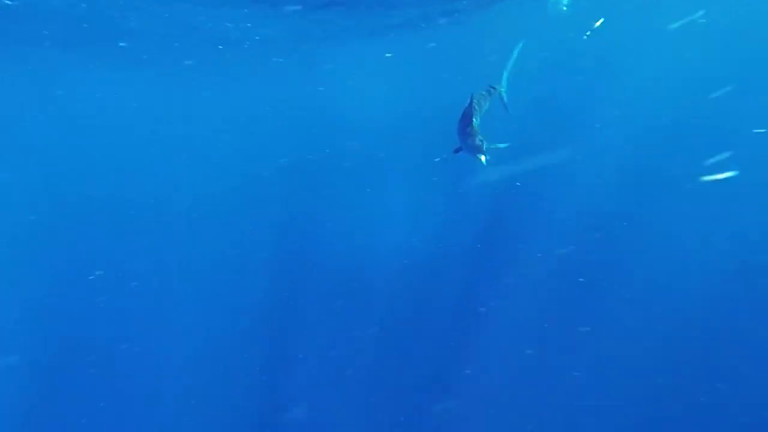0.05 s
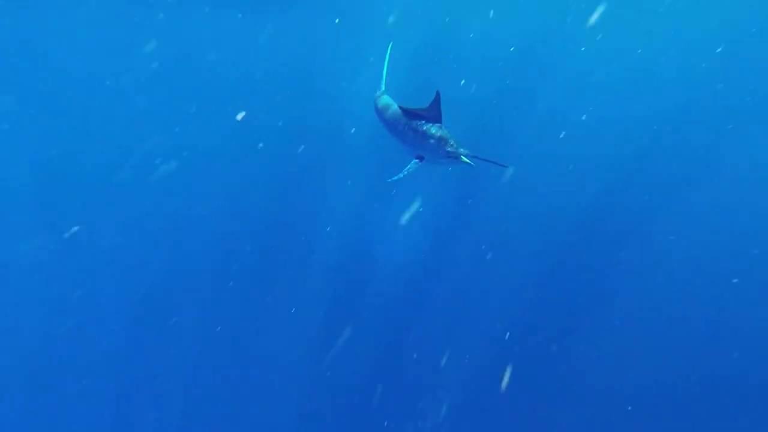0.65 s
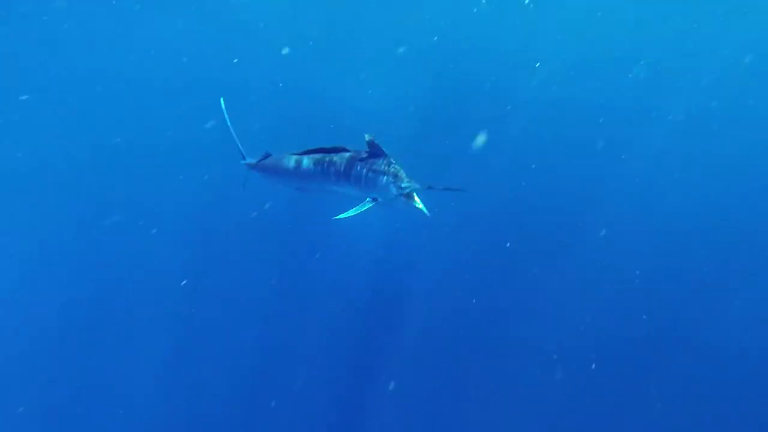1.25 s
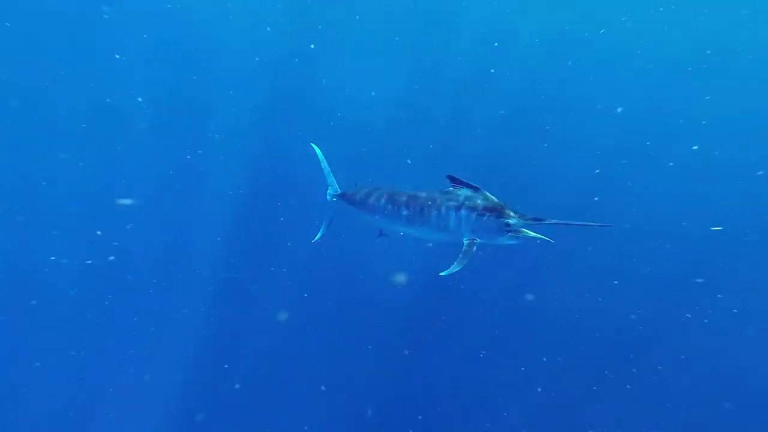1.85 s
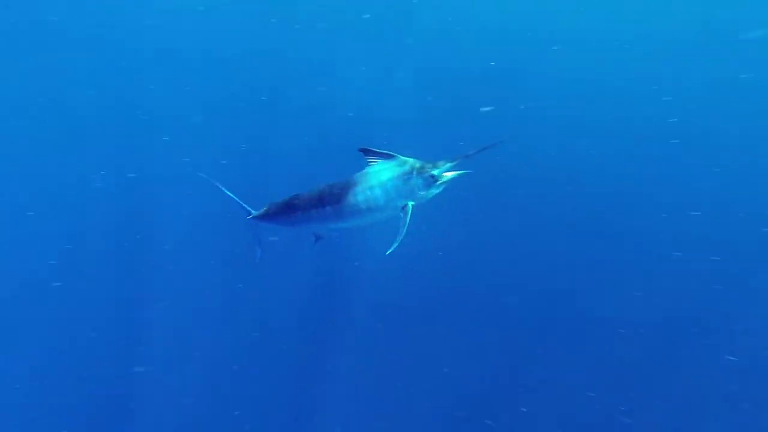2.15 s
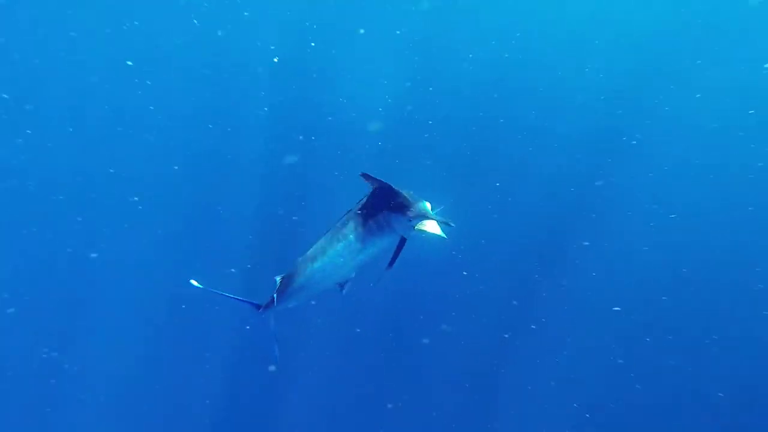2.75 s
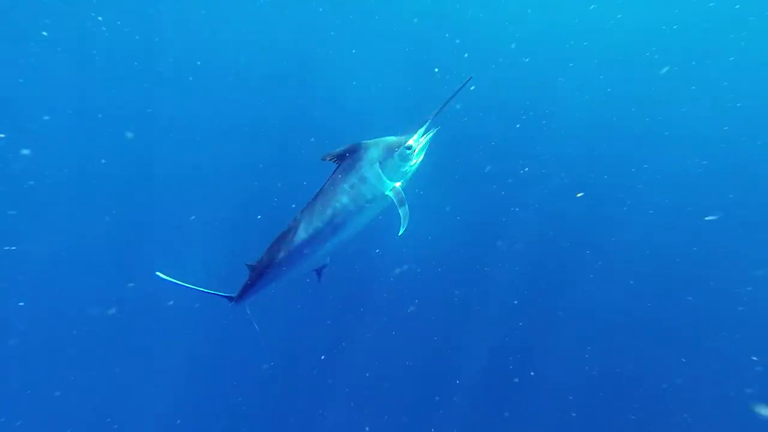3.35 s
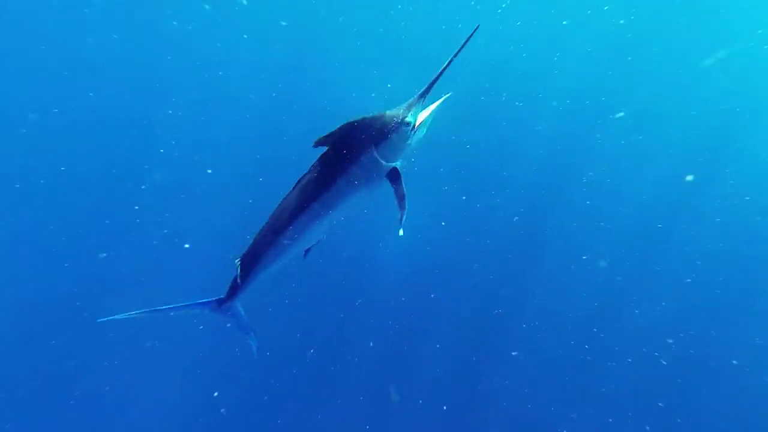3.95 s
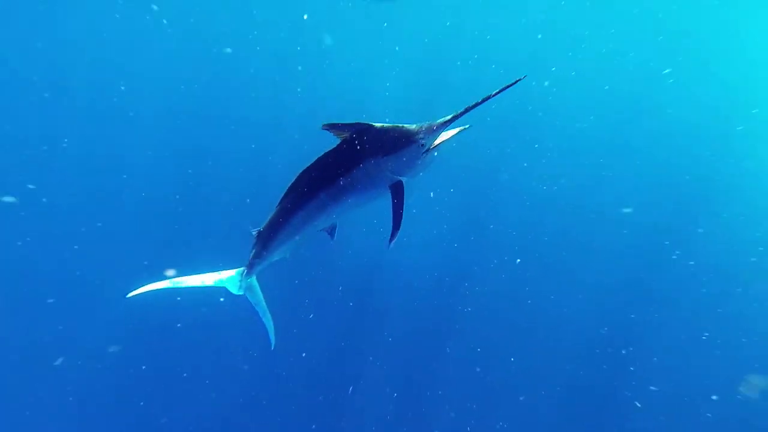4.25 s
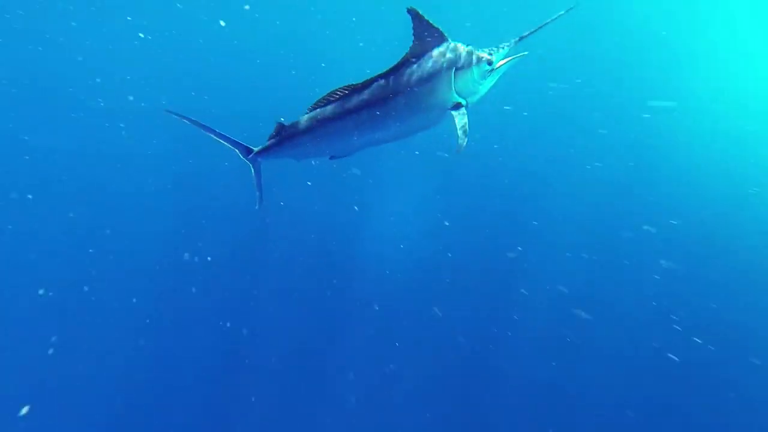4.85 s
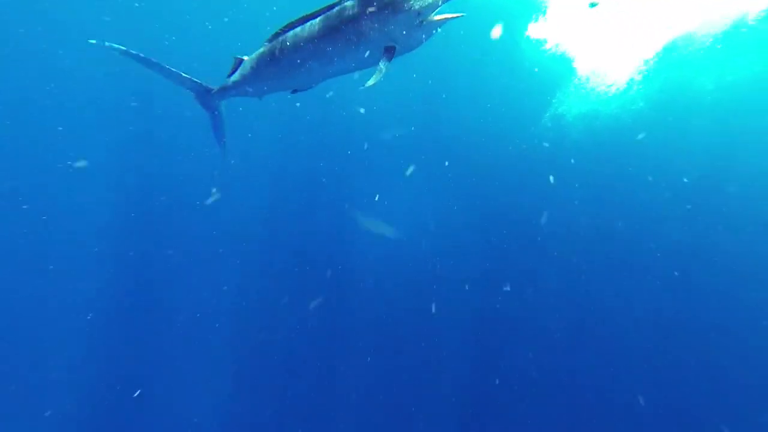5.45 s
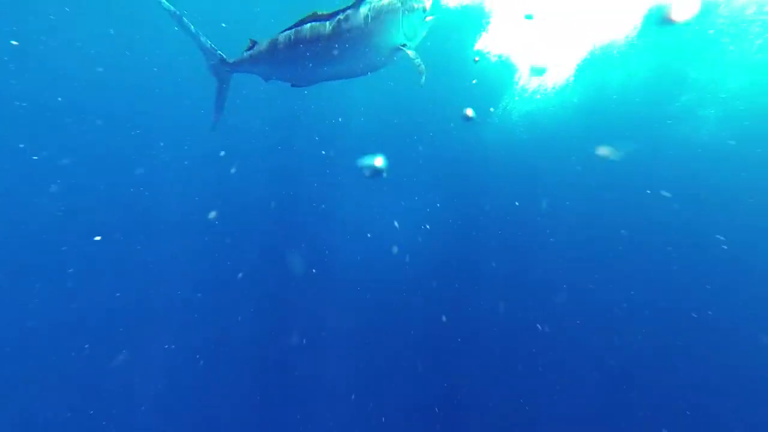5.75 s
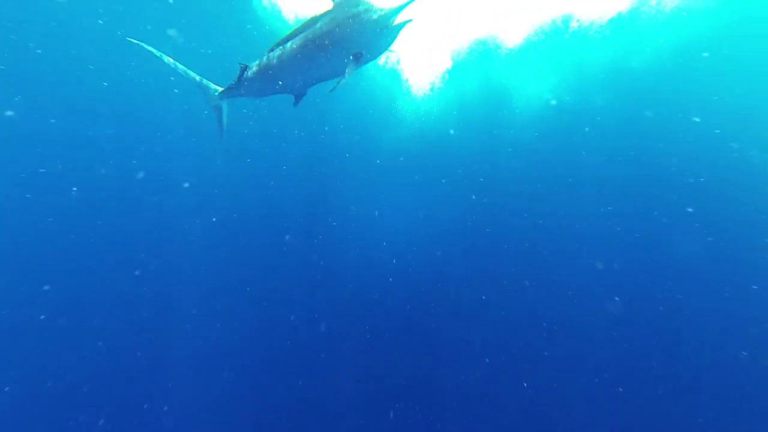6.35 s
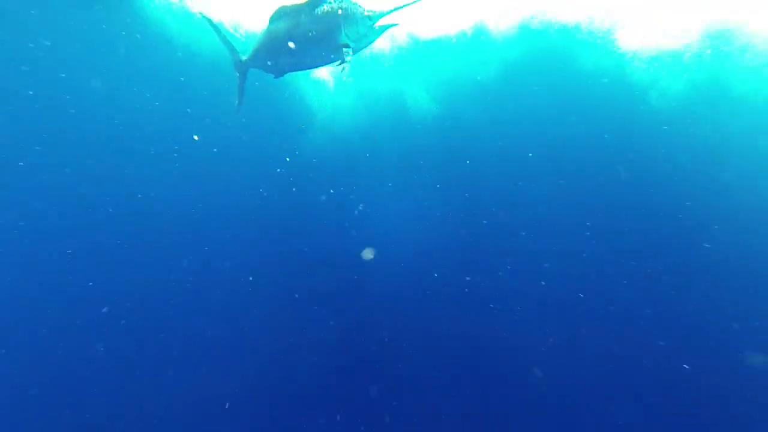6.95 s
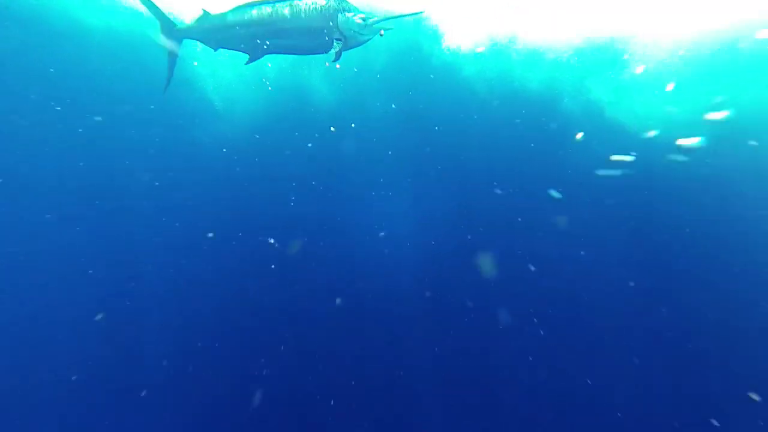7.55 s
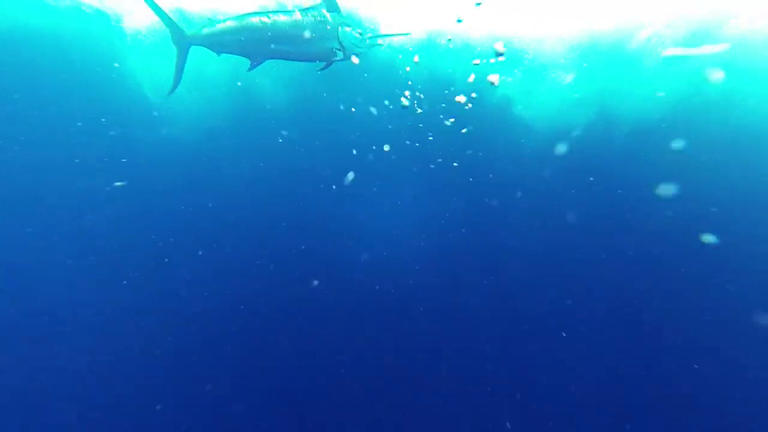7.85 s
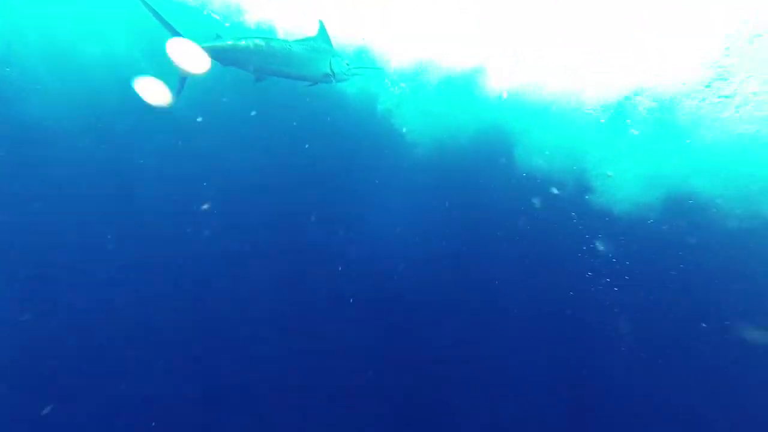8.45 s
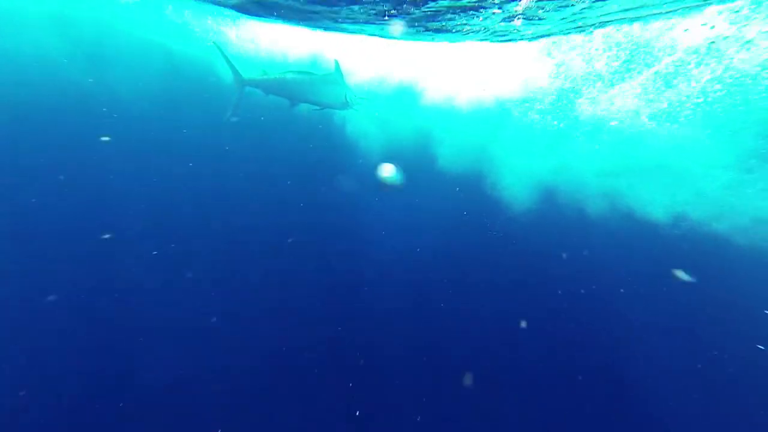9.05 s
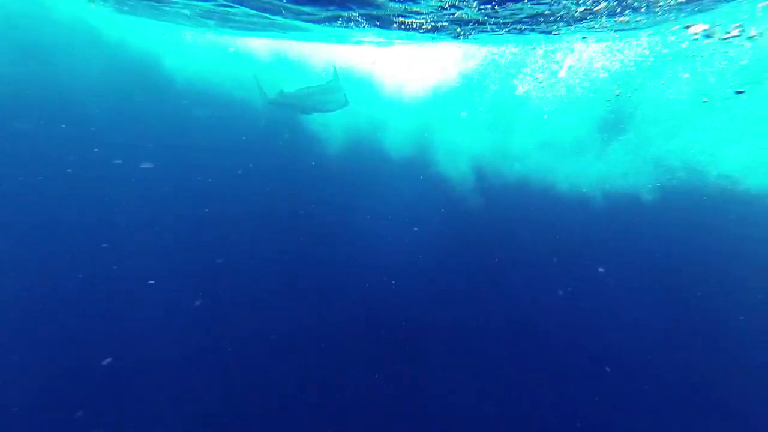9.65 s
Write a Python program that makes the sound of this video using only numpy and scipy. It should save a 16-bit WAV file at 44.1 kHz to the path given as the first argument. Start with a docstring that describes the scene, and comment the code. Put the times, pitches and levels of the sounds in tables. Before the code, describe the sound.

Muffled water rushes in swells over a camera towed just below the sea surface, above a low shuddering rumble. Dull thumps and knocks hit the housing while bubbles glug and pop. Midway, the taut tow line hums, rising to a low growl with the strongest rush, until a jolt cuts it off. Crackling bubbles, more thumps and soft gurgles follow, all heard from inside the sealed case.

```python
"""Just under the surface of the sea, a camera in a sealed housing is towed behind a boat.
Turbulent water rushes over the housing and excites its resonances; the body shudders in its own wake.
Big bubbles glug past as damped oscillators, and clouds of small ones gurgle, crackle and sizzle on the case.
Jolts of the tow line thump the housing and stall the flow; vortex shedding strums the line as it speeds up."""
import sys
import numpy as np
from scipy import signal
from scipy.fft import rfft, irfft
from scipy.io import wavfile
from scipy.ndimage import uniform_filter1d

SR = 44100
rng = np.random.default_rng(int(sys.argv[2]) if len(sys.argv) > 2 else 0)


def unload_wav(signal):
    """Save mono or channel-first audio to the path in sys.argv[1] as 16-bit WAV at rate SR, clipped to [-1, 1]."""
    wavfile.write(
        sys.argv[1],
        SR,
        np.round(np.clip(np.atleast_2d(signal).T, -1, 1) * 32767).astype(np.int16),
    )


N = 428211
TIME, BINS = np.arange(N) / SR, np.fft.rfftfreq(N, 1 / SR)
EDGE_HZ = 15800
SLACK_S = 0.02  # the line goes slack this long before a jolt; also the fade of strum and spray


def amp(db):
    """Amplitude ratio of a level in decibels."""
    return 10 ** (np.asarray(db) / 20)


def unit_rms(x):
    """Normalisation to rms 1."""
    return x / np.sqrt(np.mean(x ** 2) + 1e-20)


def colour(points):
    """Spectral envelope through (Hz, dB) points on a logarithmic frequency axis."""
    hz, db = np.transpose(points)
    return amp(np.interp(np.log(BINS + 1), np.log(hz + 1), db))


def filtered(x, gain):
    """Linear filtering by one gain per frequency."""
    return irfft(rfft(x) * gain, N)


def noise(gain):
    """Spectrally shaped noise of rms 1."""
    return unit_rms(filtered(rng.standard_normal(N), gain))


def wander(rate_hz):
    """Random modulation of rms 1, mostly below the given rate."""
    return unit_rms(np.interp(2 * rate_hz * TIME, np.arange(N // 10), rng.standard_normal(N // 10)))


def drifted(x, share, rate_hz=6):
    """Frequency modulation: a varying delay slides every pitch in x by about this share."""
    return np.interp((TIME + share * np.cumsum(wander(rate_hz)) / SR) % TIME[-1], TIME, x)


def add(mix, s, sound):
    """Superposition of a sound on the mix at s seconds."""
    part = mix[max(round(s * SR), 0):][:len(sound)]
    part += sound[:len(part)]


def resonance(hz, width):
    """Resonance curve of one mode, falling to half at width Hz from its centre."""
    return 1 / (1 + ((BINS - hz) / width) ** 2)


# Modes of the housing. Each row: frequency in Hz, half width in Hz, gain in dB.
HOUSING_MODES = [(523, 316, -14), (672.5, 89, 1.5), (1170, 360, -11.5), (1416, 211, 2.5),
                 (2136, 360, -11.5), (2730, 616, -21), (4000, 1300, -36.5)]
def housing(leak_db=-17):
    """Transmission through the housing: its modes and a muffled leak add in power."""
    power = sum((amp(db) * resonance(hz, width)) ** 2 for hz, width, db in HOUSING_MODES)
    return np.sqrt(power + amp(leak_db) ** 2 / (1 + (BINS / 900) ** 4))


# Swells of flow. Each row: start in seconds, crest in seconds, rush in dB, treble relative to the rush
# in dB (set by air in the water), foam hiss in dB, shudder in dB.
FLOW_SWELLS = [(-0.6, 0.038, -48, -20, -65, -30), (0.822, 1.246, -59, 11, -56.5, -53),
               (1.105, 1.787, -38.5, -1.5, -56, -29.5), (1.724, 2.004, -35, -18, -48, -39),
               (1.948, 2.24, -38.5, 2, -57, -36), (2.523, 3.74, -39.5, 6.5, -56.5, -38),
               (4.35, 4.907, -37, 2, -55, -46), (5.786, 6.35, -31.5, 6.5, -45.5, -56),
               (7.25, 7.484, -46.5, -26.5, -73, -43), (8.334, 8.68, -46, -26, -87, -36),
               (8.894, 9.447, -72, -13, -97, -31)]
def swells(levels_db, calm_db, sag_db_per_s, release_db_per_s=1109, build_db=22.5):
    """Incoherent swells add in power; each builds to a crest and is cut off just before the next blow."""
    t, power = TIME[::64], amp(calm_db) ** 2
    for (start, crest, *_), db in zip(FLOW_SWELLS, levels_db):
        cutoffs = [s - SLACK_S for s, pressure, _ in blows() if s > crest and pressure > 0]
        end = min(cutoffs, default=N / SR)
        build = build_db * np.maximum((crest - t) / (crest - start), 0) ** 1.015
        fall = sag_db_per_s * np.maximum(t - crest, 0) + release_db_per_s * np.maximum(t - end, 0)
        power = power + amp(db - build - fall) ** 2
    return np.interp(TIME, t, np.sqrt(power))


def flow(stall_db_per_pressure=14.5, recover_s=0.051):
    """Flow noise follows the flow: the gains of rush, treble and hiss dip as each blow stalls it."""
    _, _, rush_db, air_db, hiss_db, _ = np.transpose(FLOW_SWELLS)
    stalled = amp(-stall_db_per_pressure * aftermath(recover_s))
    return stalled * np.array([swells(rush_db, calm_db=-56.5, sag_db_per_s=3.5),
                               swells(rush_db + air_db, calm_db=-57.5, sag_db_per_s=3.5),
                               swells(hiss_db, calm_db=-78, sag_db_per_s=19.5)])


# Spectrum of fine foam. Each row: frequency in Hz, relative spectral level in dB.
FOAM_SPECTRUM = [(2500, -6), (4300, 5.5), (6300, -4.5), (7300, 0), (10200, 0), (11200, -5), (12000, -16.5),
                 (15500, -29)]
def rush(eddy_db=2.5, grain_db=3.0, treble_hz=1800, ripple_db=2.0, flicker_db=0.6):
    """Forced vibration: eddies and tiny bubbles drive the housing's modes, and foam hisses above them."""
    body_gain, treble_gain, hiss_gain = flow()
    eddies = amp(eddy_db * wander(110))
    impacts = unit_rms(rng.standard_normal(N) * eddies * amp(grain_db * wander(760)))
    shell = filtered(impacts, housing())
    bands = [resonance(hz, width) for hz, width, _ in HOUSING_MODES]
    total = sum(bands)
    # Each mode slides and flutters with the air around the housing.
    modes = [drifted(filtered(shell, band / total), .02) * amp(wander(30)) for band in bands]
    # Neighbouring modes cancel at antiresonances.
    notches = np.prod([1 - 0.63 * resonance(hz, 0.024 * hz) for hz in (860, 1736, 2476, 4870)], axis=0)
    shell = unit_rms(filtered(sum(modes), notches))
    treble = filtered(shell, 1 / (1 + (treble_hz / (BINS + 1)) ** 10))
    # The many high modes of the walls ripple the spectrum.
    ripple = np.interp(BINS / 200, np.arange(SR // 100), rng.standard_normal(SR // 100))
    fizz = drifted(filtered(impacts, colour(FOAM_SPECTRUM) * notches * amp(ripple_db * ripple)), .02)
    foam = unit_rms(fizz) * hiss_gain * unit_rms(amp(flicker_db * wander(300)))
    return (shell - treble) * body_gain + treble * treble_gain + foam


# Spectrum of the wake. Each row: frequency in Hz, relative spectral level in dB.
WAKE_SPECTRUM = [(10, -7), (26, 1), (40, -11), (70, -9.5), (160, -30.5), (300, -38), (1500, -78)]
def buffet(sway_hz=29.9, sway_db=-3, wake_db=0.5, drift=0.087):
    """Wake buffeting: the towed body shudders at a loose rate in its own turbulence."""
    shudder_db = [row[-1] for row in FLOW_SWELLS]
    shudder = swells(shudder_db, calm_db=-42.5, sag_db_per_s=-3.5, release_db_per_s=607)
    sway = np.sin(2 * np.pi * np.cumsum(sway_hz * (1 + drift * wander(9.7))) / SR)
    return shudder * (amp(sway_db) * unit_rms(sway) + amp(wake_db) * noise(colour(WAKE_SPECTRUM)))


def ring(hz, decay_ms, attack_ms, glide=0):
    """Damped oscillation whose envelope peaks at 1; the pitch slides by the share glide."""
    ms = np.arange(SR // 12) * 1000 / SR
    pitch = hz * (1 + glide * np.tanh(ms / decay_ms / 2))
    envelope = (1 - np.exp(-(ms / attack_ms) ** 2)) * np.exp(-ms / decay_ms)
    return envelope / envelope.max() * np.sin(2 * np.pi * np.cumsum(pitch) / SR)


def glug(hz, decay_ms, attack_ms=1.67, shell_hz=1330, shell_db=-15, wobble=0.4):
    """Bubble resonance: pinch-off gives a faint tick and a wobbling tone; the housing rings along."""
    tone = ring(hz, decay_ms, attack_ms, glide=0.061 * rng.uniform(-1.08, 2.08))
    shake = unit_rms(signal.lfilter(*signal.butter(3, 350, fs=SR), rng.standard_normal(len(tone))))
    out = tone * (1 + wobble * shake) + amp(shell_db) * ring(shell_hz, decay_ms, attack_ms)
    add(out, 0, amp(-27) * rng.exponential() * tick(hz=4300))
    return out


# Big bubbles pinching off. Each row: start in seconds, level in dB, pitch in Hz, decay in ms.
BIG_BUBBLES = [(0.013, -22, 1324, 11.3), (0.41, -25, 764, 15), (0.424, -27, 1333, 6.3),
               (0.922, -20, 559, 11), (.939, -13, 1224, 6.8), (0.97, -18, 652, 9.7), (0.992, -19, 524, 25),
               (1.017, -18.5, 643, 6.8), (1.038, -14.5, 1285, 5.9), (1.156, -23.5, 1234, 3.8),
               (1.848, -20.5, 1480, 7.5), (5.497, -23.5, 1360, 8.6), (5.542, -30.5, 850, 9.4),
               (7.047, -14.5, 1560, 4.6), (8.595, -26.5, 1217, 5.8), (8.706, -24, 1030, 3.8),
               (8.806, -29, 770, 7), (9.02, -18, 1035, 6.5), (9.098, -27.5, 1337, 18),
               (9.225, -23.5, 1102, 17.5)]
def glugs():
    """Free oscillation: each big bubble rings at its own natural frequency."""
    out = np.zeros(N)
    for s, db, hz, decay_ms in BIG_BUBBLES:
        add(out, s, amp(db) * glug(hz, decay_ms))
    return out


def crunch(hz, decay_ms, span=2, order=3):
    """Broadband transient: a toneless, fast-dying burst of noise from hz / span to hz * span."""
    ms = np.arange(SR // 20) * 1000 / SR
    burst = rng.standard_normal(len(ms)) * np.exp(-ms / decay_ms)
    band_hz = [hz / span, min(hz * span, EDGE_HZ)]
    snap = signal.lfilter(*signal.butter(order, band_hz, "band", fs=SR), burst)
    return snap / abs(snap).max()


def tick(hz):
    """Brief impact: a speck or tiny bubble makes a thin, high snap."""
    return crunch(hz, decay_ms=1.2, span=1.3)


# Specks striking the case, and the bright click that rides on the bubble burst at 5.543 s. Each row: start in
# seconds, peak level in dB, band centre in Hz.
SPECKS = [(0.159, -30, 6700), (0.682, -39.5, 8800), (2.956, -34.5, 9300), (3.769, -27, 5550),
          (5.256, -31.5, 7500), (5.543, -50, 5850), (7.008, -26.5, 5640), (8.659, -30.5, 3800),
          (9.105, -35, 5540)]
def ticks():
    """Impact noise: single specks tick on the case, and one bubble burst adds a bright click."""
    out = np.zeros(N)
    for s, db, hz in SPECKS:
        add(out, s, amp(db) * tick(hz))
    return out


def pop(hz, decay_ms, shell_hz=1250, shell_db=-14, snap_db=-10, snap_hz=1450):
    """Impulse excitation: a bubble on the wall snaps, rings and knocks the housing."""
    out = ring(hz, decay_ms, attack_ms=.4)
    overtone = ring(hz * rng.uniform(2.15, 2.8), min(decay_ms / 2, 1), attack_ms=.2)
    out += amp(-17 + 13 * np.log2(hz / 2500)) * overtone  # stronger in small bubbles
    add(out, 0, amp(snap_db) * crunch(snap_hz, decay_ms * 1.12))
    return out + amp(shell_db) * ring(shell_hz, decay_ms=2.1, attack_ms=0.57)


# Bubbles bursting on the case, and two knocks at 2.958 s and 5.069 s that ring the same way. Each row: start in
# seconds, level in dB, pitch in Hz, decay in ms.
BURSTS = [(0.169, -26, 1375, 5), (0.285, -23.5, 1390, 3.4), (0.575, -35, 2360, 3.3),
          (0.707, -22, 1390, 4.2), (0.963, -28, 2350, 5.6), (1.63, -20, 1010, 0.55),
          (1.923, -15.5, 2090, 0.41), (2.164, -10, 990, 0.92), (2.958, -20.5, 900, 0.13),
          (5.069, -25, 1370, 2.6), (5.101, -24, 1930, 1.4), (5.21, -25, 1374, 3.9),
          (5.409, -21.5, 1670, 1.4), (5.543, -14, 2130, 3.7), (5.584, -25.5, 1950, 2.5),
          (5.592, -26.5, 1510, 5.3), (7.486, -23, 1430, 1.2), (7.517, -23.5, 1460, 2),
          (7.562, -21, 1420, 2.8), (7.683, -19.5, 1420, 2.1), (7.771, -21, 1800, 4.9),
          (7.793, -17.5, 1530, 3.5), (7.819, -20, 1490, 2.4), (7.974, -24, 1360, 4.7),
          (8.1126, -29.5, 1500, 2.4), (8.137, -19, 2130, 0.86), (8.174, -25, 2550, 1),
          (8.209, -16.5, 2470, 1.5), (8.215, -16, 2670, 3), (8.2318, -22.5, 2870, 2.4),
          (8.285, -20.5, 2380, 0.98), (8.303, -20, 2360, 1.6)]
def pops():
    """Heavy damping: bubbles that burst on the case ring for only milliseconds."""
    out = np.zeros(N)
    for s, db, hz, decay_ms in BURSTS:
        add(out, s, amp(db) * pop(hz, decay_ms))
    return out


# Further blows, each with its own width: two hard knocks on the housing and one jolt of the line at 0.7245 s.
# Each row: time in seconds, relative pressure, half width in ms.
SHARP_BLOWS = [(0.2235, 0.37, 0.46), (0.7245, 0.47, 1.57), (2.1641, 0.22, 0.59)]
# Jolts of the tow line. Each row: time in seconds, relative pressure, delay of the rebound in ms,
# relative pressure of the rebound, which acts the other way.
LINE_JOLTS = [(0.267, 0.47, 26.3, 0.36), (0.292, 0.09, 22, 0.33), (2.54, 0.46, 28, 0.036),
              (2.597, 0.12, 18, 0.08), (2.737, 0.37, 67, 0.16), (2.9072, 0.38, 51, 0.27),
              (4.3427, 0.41, 24.6, 0.11), (5.0594, 0.5, 23, 0.31), (5.092, 0.089, 6.3, 0.16),
              (5.1486, 0.31, 88, 0.19), (5.3138, 0.35, 85, 0.14), (7.1218, 0.49, 65, 0.16),
              (7.3027, 0.34, 9.7, 0.18), (7.7242, 0.35, 29, 0.12), (8.249, 0.4, 5.4, 0.21),
              (8.3741, 0.45, 15, 0.057)]
def blows(unit_width_ms=1.58, stiffening=0.4):
    """Stiffening makes harder jolts briefer. Lists all blows as (s, signed pressure, half width ms)."""
    pulses = [(s, pressure) for s, pressure, _, _ in LINE_JOLTS]
    pulses += [(s + ms / 1000, -rebound) for s, _, ms, rebound in LINE_JOLTS]
    shaped = [(s, pressure, unit_width_ms / abs(pressure) ** stiffening) for s, pressure in pulses]
    return shaped + list(SHARP_BLOWS)


def thumps(leak_hz=18, damping=0.45, snap_db=-23, snap_hz=2500):
    """Transient response: each blow is a pressure pulse and a snap of the mount; the case's air rebounds."""
    push, snaps = np.zeros((2, N))
    ms = np.arange(-SR // 25, SR // 25) * 1000 / SR
    for s, pressure, width in blows():
        add(push, s + ms[0] / 1000, pressure / np.cosh(np.clip(ms / width, -20, 20)) ** 2)
        abruptness = pressure / width
        add(snaps, s, amp(snap_db) * abruptness * crunch(snap_hz, decay_ms=1.7, order=2))
    omega = 2 * np.pi * leak_hz
    resonant_highpass = signal.bilinear([1, 0, 0], [1, damping * omega, omega ** 2], SR)
    return signal.lfilter(*resonant_highpass, push) + snaps


def aftermath(decay_s):
    """Exponential decay: the summed envelope left by the blows of positive pressure."""
    t = TIME[::32]
    tails = (max(pressure, 0) * (t > s) * np.exp(-abs(t - s) / decay_s) for s, pressure, _ in blows())
    return np.interp(TIME, t, sum(tails))


def shiver(gain_db=-24, decay_s=0.052, top_hz=170):
    """Damped vibration: the rig rumbles briefly after each blow."""
    return amp(gain_db) * aftermath(decay_s) * noise(1 / (1 + (BINS / top_hz) ** 4))


def spit(hz, decay_ms, fizz_db=-14, fizz_hz=6800, ping_db=-14):
    """Fragmentation: a foam bubble tears on the case with a pop, a click of fizz and a fragment's ping."""
    out = pop(hz, decay_ms)
    add(out, 0, amp(fizz_db) * rng.exponential() * crunch(fizz_hz, decay_ms / 4, span=1.67))
    ping = rng.exponential() * ring(rng.uniform(3880, 8500), decay_ms / 2, decay_ms / 10)
    return out + amp(ping_db) * ping


def swarm(gain, voice, peak_per_s, band_hz, min_cycles, spread_db, sizes=40, thinning=0.45):
    """Random arrivals: bubbles of many sizes, a few much louder, come further apart in a faint cloud."""
    out = np.zeros(N)
    density = (gain / gain.max()) ** thinning + 1e-9
    pitches = np.geomspace(*band_hz, sizes)
    sounds = [voice(hz, 1000 * min_cycles * rng.uniform(1.0, 3.4) / hz) for hz in pitches]
    arrives = rng.random(N) < density * peak_per_s / SR
    strength = np.minimum(rng.exponential(1, N), 3)
    size = rng.integers(0, sizes, N)
    for i in np.flatnonzero(arrives):
        add(out, i / SR, amp(spread_db * strength[i]) * sounds[size[i]])
    return unit_rms(out) * gain * np.sqrt(density.mean() / density)


# Clouds of small bubbles. Each row: start in seconds, length in seconds, gurgle in dB, crackle in dB.
BUBBLE_CLOUDS = [(0.717, 0.096, -43, -42), (0.941, 0.12, -34.5, -60), (1.05, 0.31, -37.5, -51.5),
                 (1.815, 0.67, -38.5, -49.5), (5.092, 0.58, -51.5, -54), (7.138, 0.097, -40, -42),
                 (7.432, 0.16, -44.5, -36.5), (7.753, 0.12, -42.5, -36), (7.945, 0.18, -47.5, -39.5),
                 (8.375, 0.16, -53.5, -47), (8.549, 0.29, -40, -55.5), (8.96, 0.3, -38.5, -60)]
def clouds(attack_s=0.0073, release_db_per_s=104):
    """Incoherent summation: each cloud of bubbles arrives quickly, gurgles and crackles, and thins out."""
    power = 0
    for start, length, *levels_db in BUBBLE_CLOUDS:
        onset = np.clip((TIME - start) / attack_s, 0, 1)
        release = amp(-release_db_per_s * np.maximum(TIME - start - length, 0))
        power = power + np.outer(amp(levels_db), onset * release) ** 2
    gurgle, crackle = np.sqrt(power)
    gurgles = swarm(gurgle, glug, peak_per_s=190, band_hz=(450, 1750), min_cycles=4, spread_db=3.5)
    chirps = swarm(gurgle, glug, peak_per_s=220, band_hz=(1800, 3400), min_cycles=2.8, spread_db=4)
    spits = swarm(crackle, spit, peak_per_s=240, band_hz=(1350, 3200), min_cycles=2.3, spread_db=5)
    # Foam bursting too densely to ring.
    splash = swarm(crackle, crunch, peak_per_s=600, band_hz=(1700, 4000), min_cycles=1.5, spread_db=4)
    through_case = filtered(amp(-2) * gurgles + amp(-7) * splash, np.sqrt(housing()))
    return through_case + amp(-17) * chirps + amp(-2) * spits


# Jets of fine spray. Each row: start in seconds, end in seconds, band centre in Hz, level in dB.
SPRAY_JETS = [(0.95, 1.9, 9900, -64), (1.87, 2.145, 5900, -51), (4.73, 5.045, 10300, -61)]
def spray(grains_per_s=1300, width_hz=2300, rise_share=0.58):
    """Shot noise: jets of tiny bubbles pepper the case; the finer they are, the higher the sizzle."""
    grains = rng.standard_normal(N) * (rng.random(N) < grains_per_s / SR)
    out = 0
    for start, end, hz, db in SPRAY_JETS:
        crest = start + rise_share * (end - start)
        envelope = np.interp(TIME, [start, crest, end, end + SLACK_S], [0, 1, 1, 0])
        out = out + amp(db) * envelope * unit_rms(filtered(grains, resonance(hz, width_hz) ** 2))
    return out


# Spectrum of the line's growl. Each row: frequency in Hz, relative spectral level in dB.
GROWL_SPECTRUM = [(30, 19), (80, 13), (160, 4.5), (330, 11), (560, -1.5), (800, -0.5), (1200, -89)]
# Surges of the taut line, one list each. Each row: time in seconds, shedding rate in Hz, level in dB,
# lengthwise shake relative to that level in dB.
LINE_SURGES = [
    [(3.2, 102, -65.5, 5), (3.7, 107.4, -52, -3), (4.33, 108.1, -42, -12)],
    [(4.45, 116.9, -64, 4.5), (4.75, 131.6, -48.5, -4), (5.06, 166.3, -35.5, -1.5)],
    [(5.4, 125, -68.5, 1.5), (5.9, 152, -52, -13.5), (6.13, 170.6, -35.5, -3), (6.4, 186.4, -31, -3),
     (6.65, 187.6, -31, -2.5), (6.85, 183.4, -29, -4), (7.11, 168.6, -32, -6.5)],
]
def strum(surge, lift_db=-5, third_db=-13, growl_db=-0.6, growth=0.34, full_pull_db=-31):
    """Vortex shedding shakes the line sideways at the shedding rate and lengthwise at twice that."""
    times, *columns = np.transpose(surge)
    hz, level_db, drag_db = [np.interp(TIME, times, column) for column in columns]
    phase = 2 * np.pi * np.cumsum(hz * (1 + .024 * wander(65))) / SR
    pull_db = level_db - full_pull_db  # a harder pull breaks the tone into a growl
    unrest = np.sqrt(amp(pull_db))
    tone = 0
    for harmonic, db in enumerate([lift_db + growth * pull_db, drag_db, third_db], 1):
        jitter = .34 * harmonic * unrest * wander(38)
        flutter = amp(4 * wander(34))
        tone = tone + amp(db) * unit_rms(np.sin(harmonic * phase + jitter) * flutter)
    growl = amp(growl_db + growth * pull_db) * noise(colour(GROWL_SPECTRUM))
    taut = uniform_filter1d(1. * ((TIME > times[0]) & (TIME < times[-1])), round(SLACK_S * SR))
    return taut * amp(level_db) * (tone + growl)


def scene():
    """Superposition: every source reaches one microphone inside the housing."""
    water = rush() + spray() + buffet()
    rig = sum(strum(surge) for surge in LINE_SURGES) + thumps() + shiver()
    bubbles = clouds() + glugs() + pops() + ticks()
    return (water + rig + bubbles)[None]


def record(dry):
    """Band limiting: a low-pass filter removes the treble above EDGE_HZ."""
    lowpass = signal.firwin(511, EDGE_HZ, window=("kaiser", 9), fs=SR)
    return signal.oaconvolve(dry, lowpass[None], "same")


dry = scene()
out = record(dry)
unload_wav(out)
```